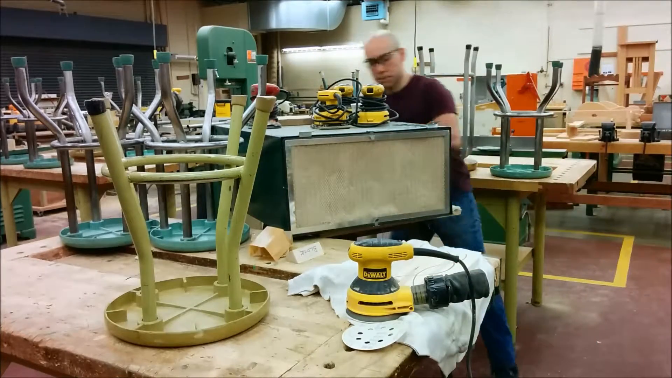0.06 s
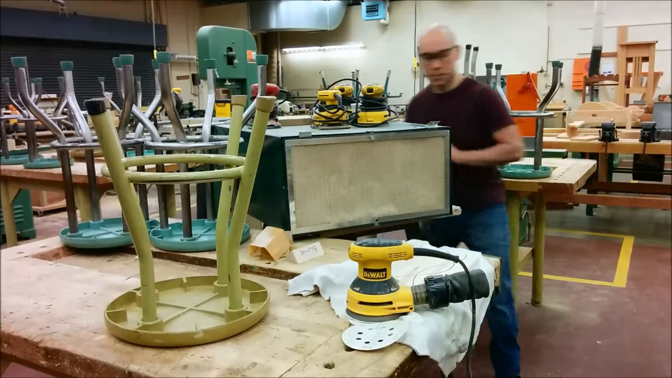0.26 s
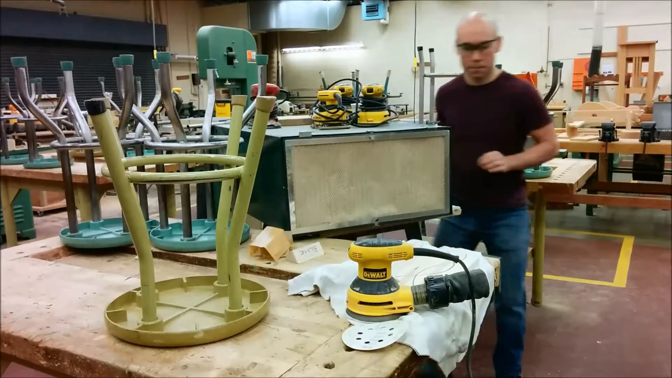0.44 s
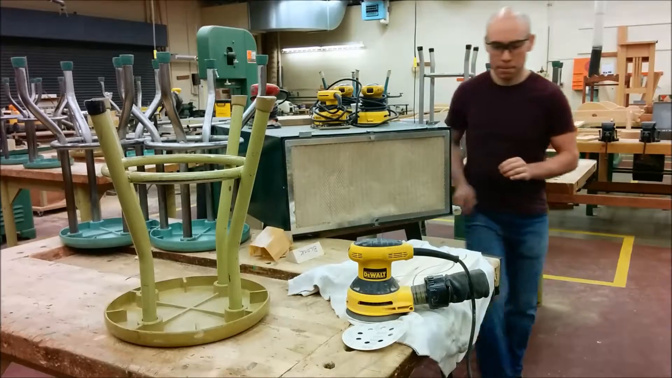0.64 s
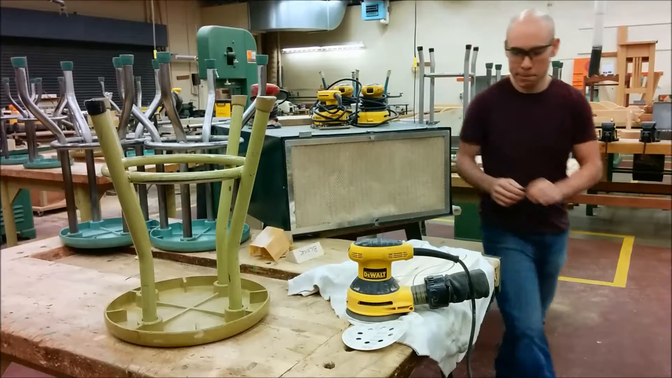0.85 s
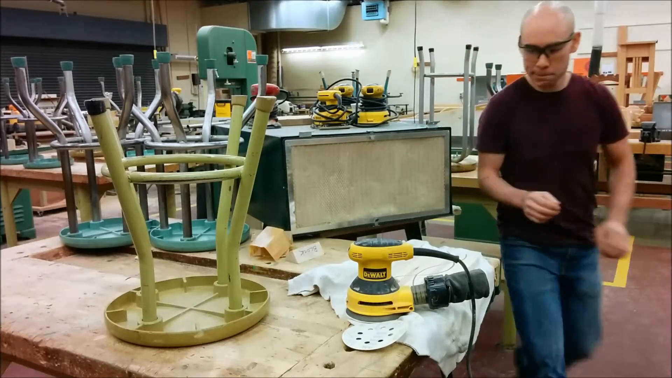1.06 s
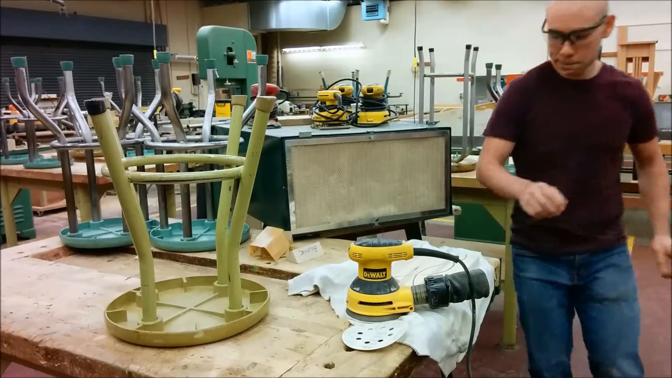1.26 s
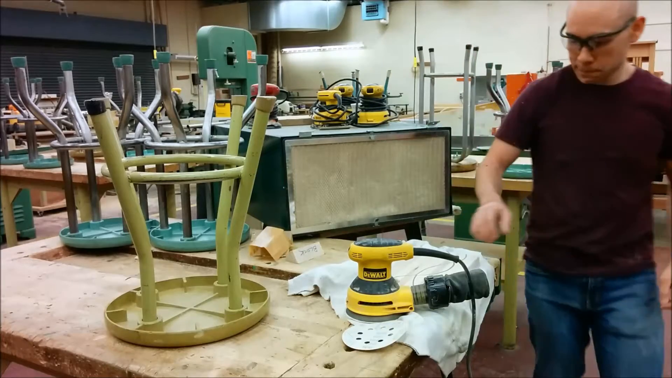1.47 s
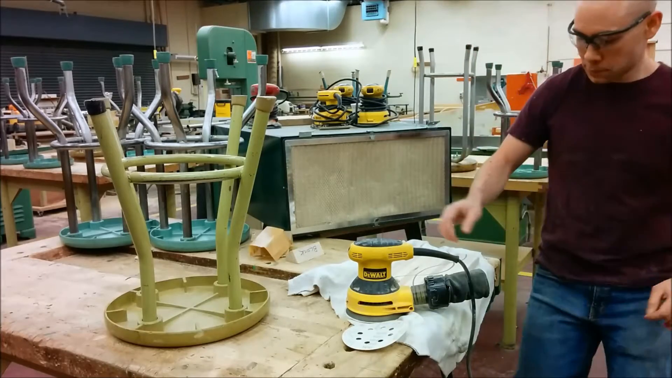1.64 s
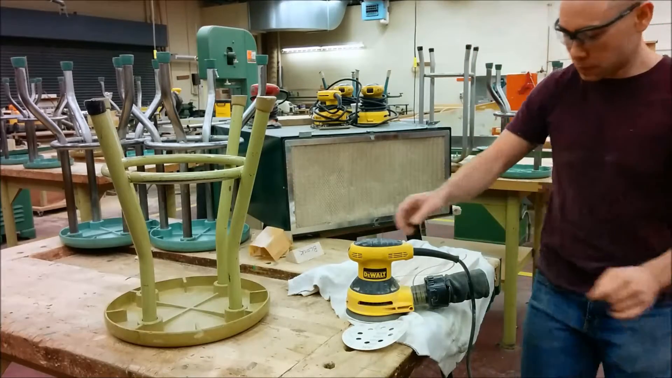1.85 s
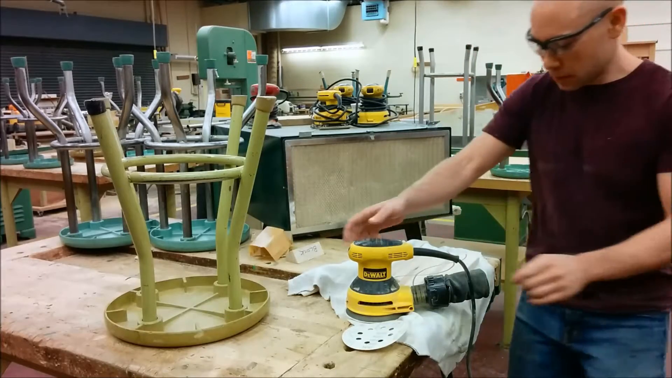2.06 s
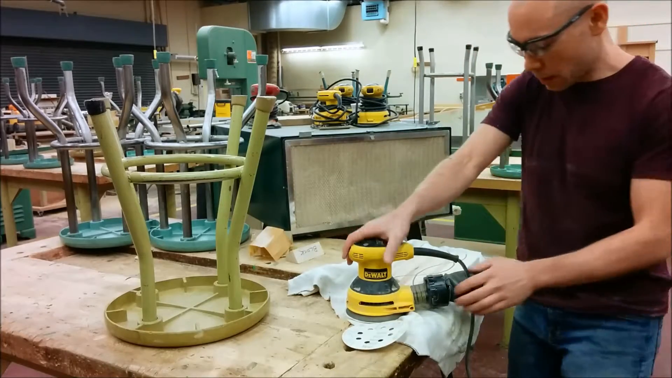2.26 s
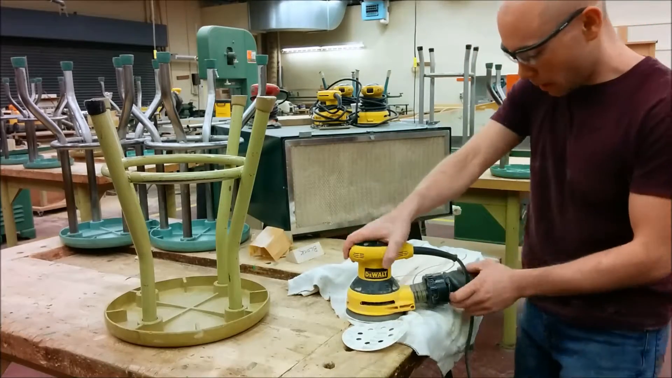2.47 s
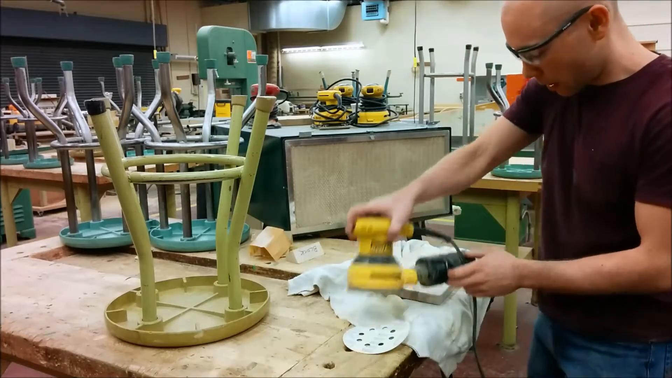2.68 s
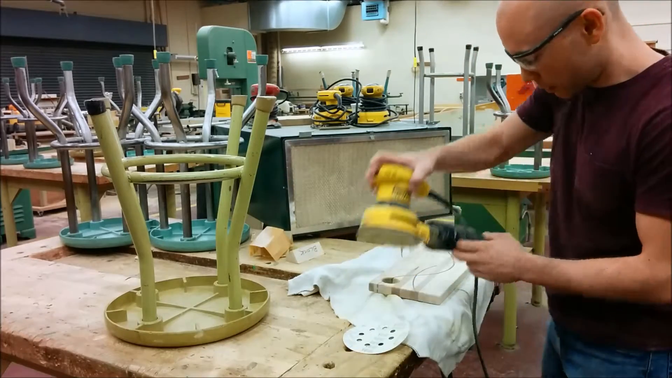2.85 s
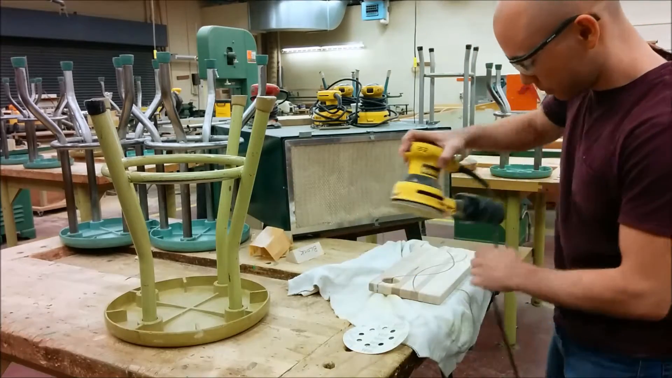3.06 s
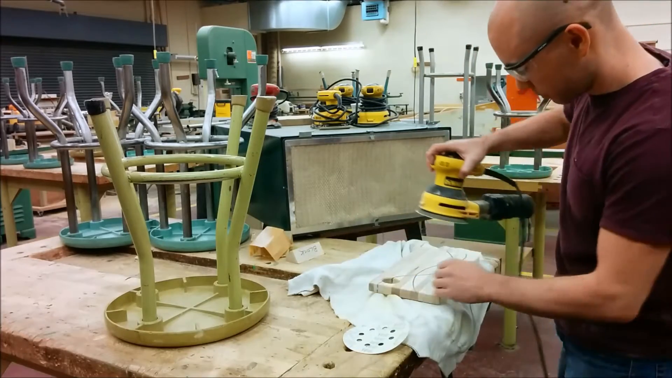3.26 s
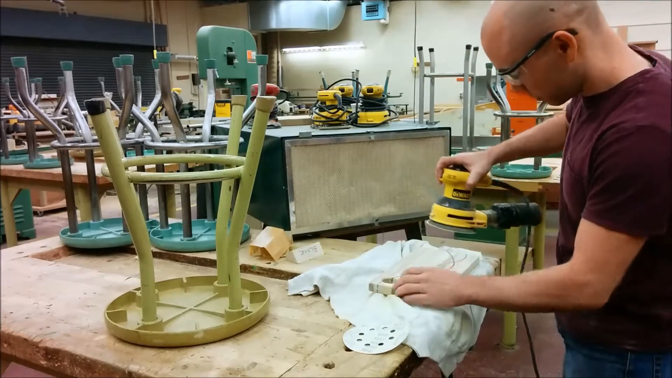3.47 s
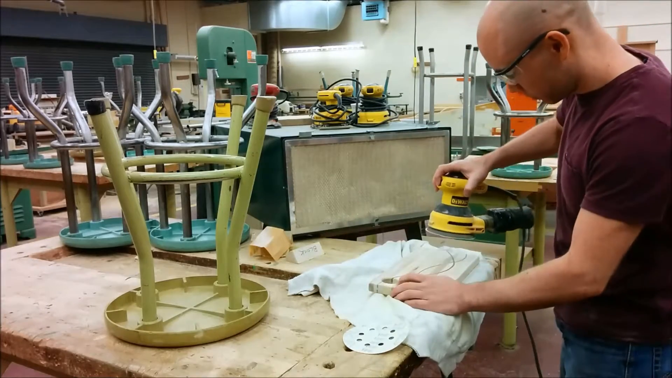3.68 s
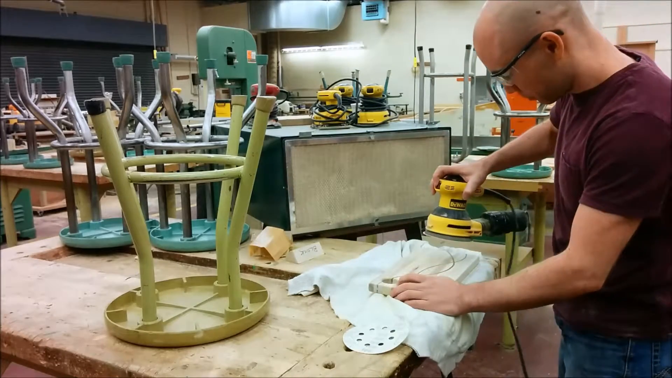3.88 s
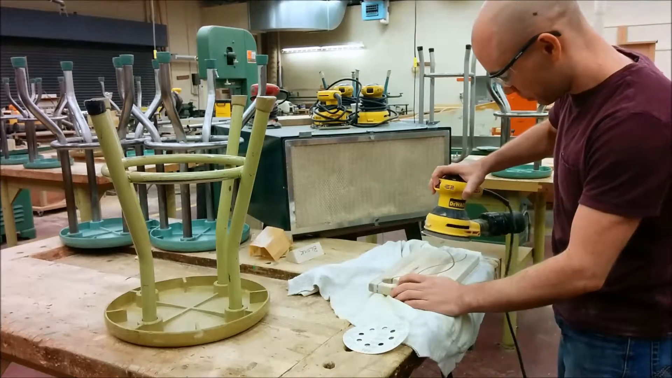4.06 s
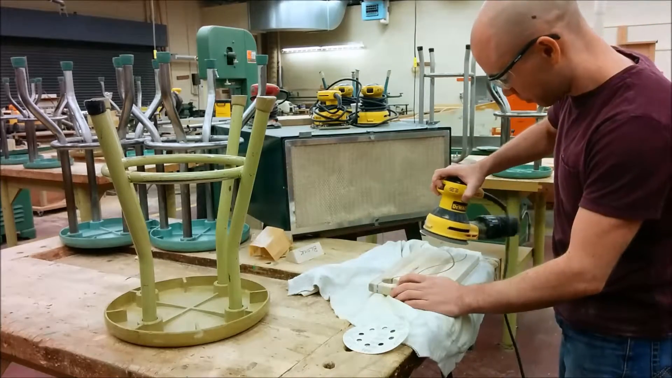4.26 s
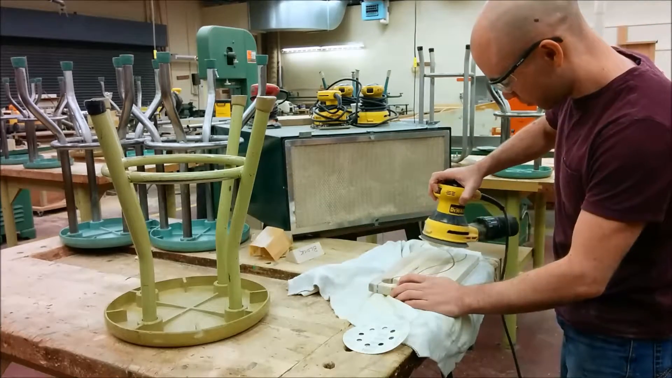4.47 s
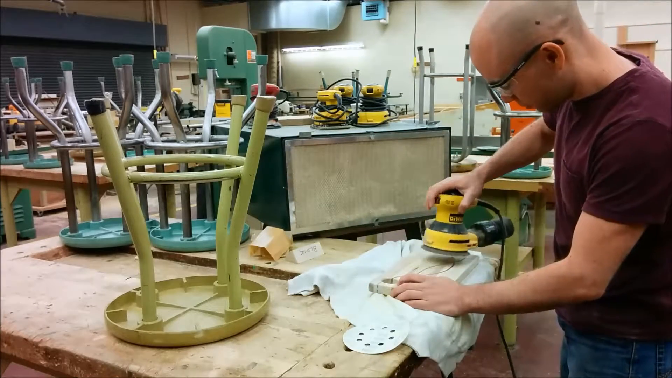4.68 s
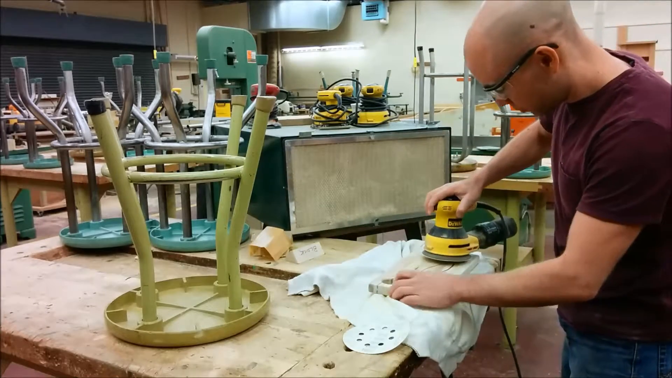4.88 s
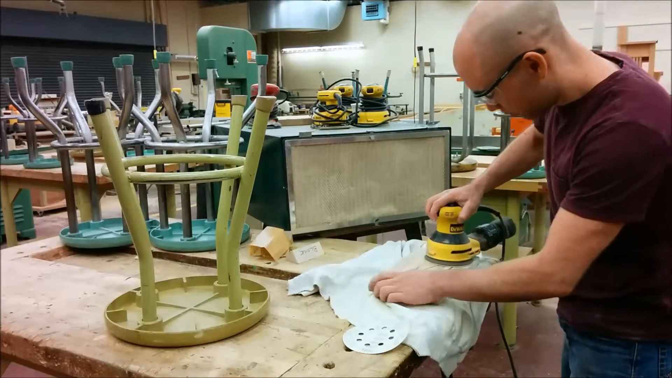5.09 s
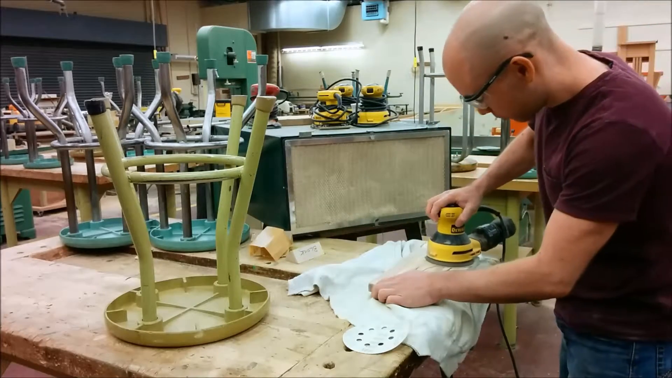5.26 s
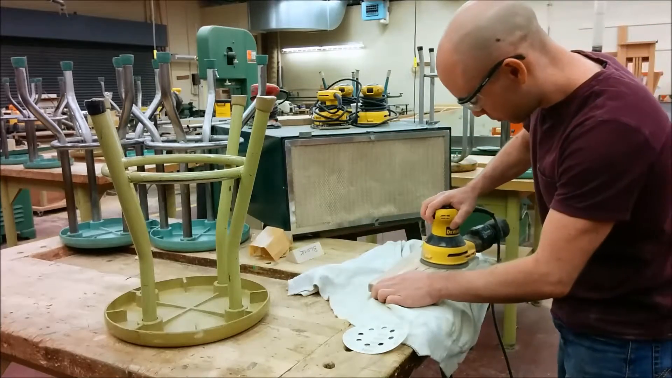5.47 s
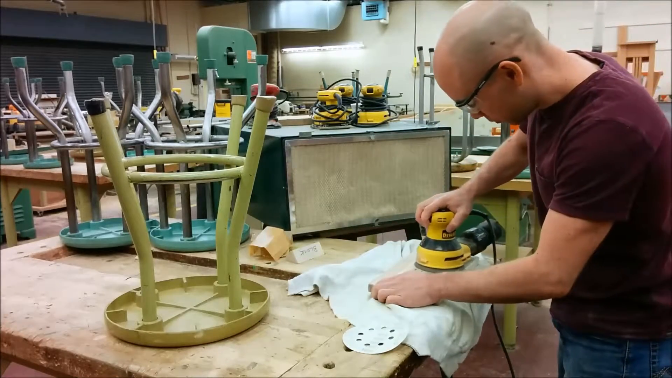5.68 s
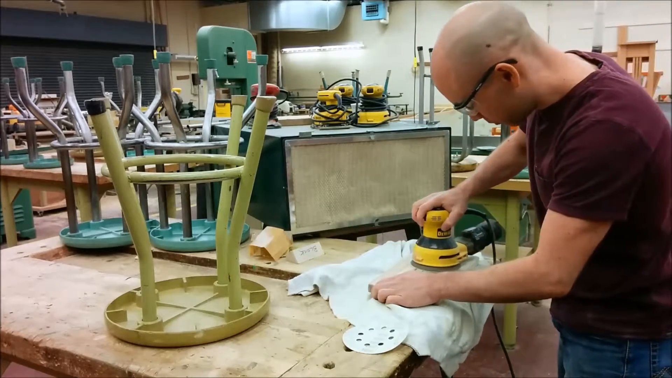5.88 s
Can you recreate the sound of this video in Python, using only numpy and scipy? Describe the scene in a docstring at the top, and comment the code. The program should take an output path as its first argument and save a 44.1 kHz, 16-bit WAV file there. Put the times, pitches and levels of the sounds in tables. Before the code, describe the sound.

Near silence opens into a low mains hum and airy extractor drone, pulsing unevenly as noise suppression chops it. Dull housing thumps, dry rattles and light shoe and hand scuffs mix in. Then a hard click, and a handheld sander revs quickly from growl to bright whine, grazes the wood, and roars with hiss, grit and low vibration. Single microphone in a hard workshop, same sound in both channels.

```python
"""A woodworking shop: a dust extractor drones, with mains hum, resonant noise and air rush throbbing with its shaft.
Its housing thumps and rattles in ringing modes; shoes and hands scuff near by in bursts of band noise.
Then an orbital sander is switched on, spins up, whines and is laid on wood: its tones follow one shaft,
and its growl, grit and hiss pulse once a turn, with the mains hum and drone returning under it.
One microphone, whose noise suppressor deepens the drone's throb."""
import sys
import numpy as np
from scipy import signal
from scipy.fft import rfft, irfft, next_fast_len
from scipy.io import wavfile
from scipy.ndimage import uniform_filter1d

SR = 44100
rng = np.random.default_rng(int(sys.argv[2]) if len(sys.argv) > 2 else 0)


def to_wav(sig):
    """Store sig (one row per channel, or 1-D mono) as 16-bit WAV at the path in sys.argv[1].

    Samples outside -1..1 are clipped; the rate is SR.
    """
    pcm = np.clip(np.atleast_2d(sig), -1, 1) * 32767
    pcm = np.round(pcm).astype(np.int16)
    wavfile.write(sys.argv[1], SR, pcm.T)  # frames by channels


N = 261572
t = np.arange(N) / SR

# Microphone hiss spectrum: pitch_hz, level_db (relative)
HISS_SPECTRUM = [(12, -25), (20, 9), (65, -15), (896, -15), (1750, -21.5), (3520, -27.5), (4410, -32),
                 (5360, -29.5), (16000, -29.5)]
HISS_DB, TOP_HZ = -71, 15850

# Extractor. Levels of its layers: time_s, hum_db, rumble_db, ring_db, rush_db
DRONE_LEVELS = [(0, -88, -83, -101, -90), (.06, -85, -78, -98, -90), (.11, -70, -87, -95, -95),
                (.2, -59, -64.5, -92, -83), (.32, -47.5, -56.5, -79, -92), (.55, -39.5, -56, -61, -66),
                (.75, -35.5, -50.5, -58.5, -69.5), (1.15, -33.5, -42, -52, -58.5),
                (1.45, -34, -42, -48.5, -53), (1.68, -40.5, -44.5, -56.5, -61),
                (1.8, -46.5, -49.5, -61, -65), (2.2, -51.5, -50, -60, -68), (2.5, -54.5, -49.5, -57, -67.5),
                (3., -55, -55, -58.5, -74.5), (3.65, -51.5, -51, -60.5, -70.5),
                (3.92, -50.5, -46, -62, -66), (3.98, -68, -55.5, -60, -68), (4.15, -64, -48.5, -53.5, -68),
                (4.22, -45, -41, -56, -64.5), (4.33, -69, -36, -41, -49.5)]
# Suppressor grip: time_s, expansion (0 = none)
GRIP = [(0, 0.08), (.8, 0.05), (1.5, 0.81), (1.8, 0.76), (3, 1.03), (4.3, 0.69), (4.5, 0.15), (5.93, 1.3)]
HUM_HZ, SHAFT_HZ = 119.6, 9.228
# Throb of the hum: thrice_a_turn_db, thrice_peak_s, once_a_turn_db, once_peak_s
HUM_THROB = (2.6, 0.024, 3, 0.075)
# Throb of rumble, ring and rush, one row each: same columns
LAYER_THROBS = [(4.5, 0.021, 2, 0.093), (3.5, 0.014, 1.5, .005), (2, 0.014, -0.5, 0.019)]
# Loping once a turn: time_s, bass_depth_db, upper_depth_db
LOPE = [(.85, 0, 0), (1.05, 1, 4.5), (1.6, 1, 4.5), (1.8, 1, 1), (2.3, 3, 1), (3.25, 3, 1), (3.45, 0, 1),
        (4.3, 0, 1)]
# Peak of the lope: bass_peak_s, upper_peak_s
LOPE_PEAKS = (.068, .037)
# Resonances of the three noise layers: pitch_hz, width_hz, level_db (relative)
RUMBLE = [(53.6, 13, -11.5), (138.5, 10.6, 1), (189, 31, 5), (270.5, 16, -3), (295, 98, -0.5),
          (333, 440, -3.5), (461, 110, -3.5)]
RING = [(592, 8.7, -4), (675, 130, -7.5), (707, 48, -3.5), (739.6, 29, -3), (886, 99, -8)]
RUSH = [(1007, 360, 3), (1490, 340, -3), (2040, 210, 0), (2295, 210, -5.5), (2420, 990, -2),
        (3500, 520, -8.5), (4900, 430, -33), (7100, 4600, -22.5)]
# Hum overtones in rumble, ring and rush, one list each: multiple, level_db (against the noise, before grip)
HUM_OVERTONES = [
    [(2, -4.5), (3, -5), (4, -30)],
    [(5, -17.5), (6, -1.5)],
    [(18, -16.5)],
]
# Fan orders in the rumble: multiple (of the shaft), level_db (against the noise)
FAN_ORDERS = [(16, -9.5), (21, -10.5), (30, -12.5), (42, -15)]

# Low thumps of the housing: start_s, level_db (before THUMP_TRIM_DB)
THUMPS = [(1.673, -25), (1.781, -36), (1.925, -26.5), (2.034, -38), (2.151, -30), (2.326, -38),
          (2.412, -36), (2.541, -50), (2.652, -35), (2.759, -39), (2.975, -46), (3.084, -42), (3.194, -41),
          (3.375, -29.5), (3.59, -34), (3.736, -39), (4.095, -34), (4.203, -30), (4.311, -34)]
# Modes rung by a thump: pitch_hz, level_db (relative)
THUMP_MODES = [(119.6, -6.5), (147, 2), (190, -4.5), (272, -6.5), (350, -11)]
THUMP_TRIM_DB, THUMP_RISE_S, THUMP_HELD_S, THUMP_T60_S = -15, 0.0035, 0.021, 0.12

# Rattles of the housing: start_s, blow_db, treble_db (against the blow, before PUFF_TRIM_DB)
RATTLES = [(0.947, -43, -8.5), (1.02, -41, -9.5), (1.098, -36.5, -10.5), (1.128, -38.5, -8.5),
           (1.175, -38, -9.5), (1.203, -34.5, -7.5), (1.237, -39.5, -7), (1.288, -33.5, -10),
           (1.318, -39, -8), (1.344, -37.5, -8.5), (1.412, -40.5, -6), (1.454, -41.5, -3),
           (1.503, -32.5, -12.5), (1.561, -36, -16), (1.603, -36, -10), (1.671, -37.5, -10),
           (1.711, -39, -9.5), (1.778, -41.5, -14), (1.814, -39, -15), (1.886, -41.5, -12),
           (1.921, -37.5, -9), (1.961, -37.5, -6.5), (2.056, -35.5, -18), (2.075, -40.5, -8),
           (2.179, -49, -8.5), (2.27, -57, -21), (2.368, -41.5, -13.5), (2.505, -44, -13), (2.612, -46, -9),
           (2.689, -42, -16.5), (2.796, -45, -19), (2.897, -43, -21), (2.938, -51, -14), (3.02, -37.5, -16),
           (3.05, -51, -12), (3.121, -42.5, -17), (3.228, -43.5, -22), (3.294, -46, -21), (3.336, -51, -19),
           (3.445, -46, -20), (3.485, -51, -20), (3.547, -43, -10.5), (3.628, -45, -26), (3.77, -47, -18),
           (3.881, -45.5, -18), (3.91, -42, -10), (4.022, -47.5, -10.5), (4.103, -46, -15),
           (4.135, -43.5, -10), (4.211, -43, -30)]
# Modes rung by a rattle: pitch_hz, level_db (against the blow)
RATTLE_MODES = [(595, -14), (680, -14), (713, -6.5), (748, -13.5), (885, -19.5), (1020, -22)]
RATTLE_HELD_S, RATTLE_HELD_S_PER_DB, RATTLE_T60_S, PUFF_TRIM_DB = 0.015, 0.001, 0.06, -6

# Scuffs of shoes and hands: start_s, level_db (before stutter), pitch_hz, width_hz, rise_s, held_s, tail_t60_s
SCUFFS = [(0.213, -57.5, 690, 1190, .004, 0.0046, 0.068), (0.577, -73, 8300, 4000, 0.0046, 0.034, 0.78),
          (.577, -78, 12500, 6000, .004, .02, .4), (1.428, -59.5, 6540, 3000, .004, 0.012, 0.32),
          (1.43, -62.5, 9400, 5000, .005, 0.06, 0.23), (1.43, -76, 13000, 5000, .005, 0.064, .4),
          (1.47, -62, 5800, 1500, .01, 0.02, 0.13), (1.495, -58, 6400, 2400, .006, 0.013, 0.12),
          (1.52, -74.5, 8000, 4000, .01, .05, .8), (1.935, -67, 7600, 6000, .005, 0.024, 0.3),
          (1.935, -76, 13000, 5000, .004, .02, .3), (2.403, -62, 7300, 2600, 0.0065, 0.012, 0.34),
          (2.402, -56, 2800, 1600, 0.0094, 0.012, 0.1), (2.412, -57, 3470, 1800, 0.01, 0.024, 0.06),
          (2.413, -62, 8000, 4030, 0.0073, 0.015, 0.3), (2.414, -59, 1980, 600, 0.0067, 0.022, 0.087),
          (2.437, -47.5, 2820, 2800, 0.0026, 0.0086, 0.13), (2.461, -66, 3600, 1200, .006, 0.015, 0.037),
          (2.438, -63, 6500, 3000, .003, 0.007, 0.11), (2.448, -52, 1440, 1300, 0.0046, 0.034, 0.04),
          (2.405, -76, 12500, 6000, .006, .05, 0.48), (2.69, -79, 9100, 8000, .005, 0.039, 0.45),
          (3.885, -71, 4500, 3500, .012, 0.025, .1), (3.915, -68, 7360, 5000, .005, 0.012, 0.39),
          (3.915, -75, 5300, 700, .004, 0.01, 0.23), (4.262, -70, 7850, 6050, 0.0061, 0.027, 0.69),
          (4.313, -58, 2900, 2400, 0.026, 0.044, 0.093)]
# Clicks of hand, switch and pad: start_s, level_db, pitch_hz, width_hz, tail_t60_s
CLICKS = [(0.582, -61, 6050, 9000, 0.3), (1.935, -60, 7000, 9000, .04), (2.420, -47, 3200, 2400, .03),
          (2.443, -48, 3500, 5000, 0.02), (2.456, -45, 1500, 1200, 0.028), (2.472, -55, 1200, 1200, 0.053),
          (3.909, -38, 5300, 4200, 0.033), (4.258, -48, 7600, 8850, 0.018), (4.351, -40, 4000, 5000, 0.017),
          (4.381, -40.5, 6500, 5000, .015), (4.651, -9, 7400, 7000, 0.0065), (4.662, -23, 5100, 1500, .02),
          (4.678, -26, 5100, 1500, .02)]
CLICK_RISE_S = 0.00082

# Mains hum and drone under the sander: time_s, level_db
RETURNING_HUM_LEVELS = [(4.9, -60), (5.1, -52), (5.25, -39), (5.4, -45), (5.5, -37), (5.75, -36),
                        (5.93, -38)]
# Resonances of the drone under the sander: pitch_hz, width_hz, level_db (relative)
RETURNING_DRONE = [(100, 20, -22), (147, 25, -13), (188, 17, -2.5), (258, 16, -9)]
RETURNING_HUM_HZ, RETURNING_DRONE_DB = 120.8, -3  # drone noise against the hum's rms of 1

# Sander. Shaft spinning up: time_s, speed_turns_per_s
SHAFT_SPEED = [(4.345, 0), (4.45, 40), (4.55, 70), (4.67, 96), (4.742, 107.7), (4.896, 124.9), (5.056, 138),
               (5.144, 144.2), (5.28, 151), (5.4, 155.3), (5.522, 158.5), (5.68, 160.8), (5.836, 162.2),
               (5.93, 162.7)]
SANDER_START_S, WOBBLE = 4.345, 0.0015  # wobble: share of the speed
# Main levels: time_s, shake_db, growl_db, grit_db, rasp_db, fine_hiss_db (last three before HISS_TRIM_DB)
SANDER_LEVELS = [(4.35, -74, -43.5, -49, -79, -83), (4.41, -79, -39.5, -39, -71, -77),
                 (4.51, -92, -35.5, -34.5, -41, -47.5), (4.68, -60, -33.5, -32.5, -35, -39.5),
                 (4.88, -61, -29.5, -31.5, -30, -43), (5.02, -61, -28, -28.5, -30, -37),
                 (5.16, -41, -25.5, -30, -29, -32.5), (5.34, -45, -27, -29.5, -29, -31.5),
                 (5.45, -34.5, -27.5, -30, -27, -27.5), (5.6, -27, -26, -31, -29.5, -29),
                 (5.71, -26.5, -27, -31, -27.5, -30), (5.76, -27, -27, -42, -36, -28.5),
                 (5.93, -26, -26, -34, -35, -29.5)]
HISS_TRIM_DB, OVERTONE_TRIM_DB = -1.5, -1
# Pad grazing the wood: peak_s, hum_swell_db, shake_db
GRAZES = [(4.665, -46, -63), (4.961, -42.5, -37), (5.045, -51, -40), (5.186, -43, -32.5), (5.365, -54, -43)]
GRAZE_WIDTH_S, GRAZE_HISS_DB = 0.011, 0.5
# Overtones of the off-centre pad: time_s, then one level_db per multiple (before OVERTONE_TRIM_DB)
SHAKE_OVERTONES = [(4.5, -75, -68, -73, -74, -74), (4.75, -69, -53, -45.5, -58, -60),
                   (4.85, -66, -58, -47.5, -62, -64), (4.95, -51, -38, -38, -58, -55),
                   (5.05, -53, -51, -42, -52, -49), (5.15, -35.5, -41, -41, -55, -56),
                   (5.25, -31.5, -42, -35.5, -36, -40), (5.35, -38.5, -34, -34, -48, -52),
                   (5.45, -33, -41, -37, -40, -51), (5.55, -30, -39, -28.5, -38, -50),
                   (5.65, -37.5, -38, -42, -33.5, -40), (5.75, -34.5, -38.5, -39, -44, -42),
                   (5.85, -45, -32.5, -35, -38, -52), (5.93, -31, -42, -37, -28, -37)]
# Those overtones: multiple (of the shaft)
SHAKE_MULTIPLES = (2, 3, 4, 5, 5.55)
# Fan whine before its echo: time_s, blade_db, upper_side_db, lower_side_db, blade_octave_db, whistle_db
WHINE_LEVELS = [(4.42, -78, -74, -78, -76, -51), (4.55, -42, -71, -75, -39.5, -45),
                (4.65, -47, -52, -58, -51, -58), (4.75, -40, -40, -48, -58, -58),
                (4.9, -34.5, -46, -42, -50, -44), (5.0, -30, -33, -47, -48, -49),
                (5.07, -41, -37, -48, -51, -32), (5.16, -33.5, -31.5, -33, -54, -40),
                (5.22, -39, -35, -59, -52, -32), (5.32, -40, -42, -46, -50, -38),
                (5.45, -35.5, -39, -57, -38.5, -33), (5.6, -32, -40, -54, -43, -35),
                (5.72, -32, -45, -46, -44, -34), (5.8, -27.5, -42, -37, -50, -54),
                (5.93, -26, -43, -41, -47, -50)]
BLADES = 13
# Side tones of the blades: multiple (of the shaft), upper then lower
SIDE_MULTIPLES = (12, 11.2)
# Upper fan tones: multiple (of the shaft), level_db (against whistle_db)
WHISTLE = [(24, -10), (29.5, -13), (31, -5), (33, -11)]
ROOM_T60_S, ROOM_DB = 0.45, -7  # shop echo against the direct sound
# Bearing squeal: time_s, pitch_hz
SQUEAL_PITCH = [(4.4, 7900), (4.55, 8020), (4.7, 8130), (4.9, 8290), (5.05, 8340), (5.3, 8400)]
# Bearing squeal: time_s, level_db (peak)
SQUEAL_LEVELS = [(4.4, -70), (4.55, -58), (4.7, -43), (4.85, -52), (4.97, -44), (5.05, -34), (5.15, -43),
                 (5.3, -82)]
# Casing noise: time_s, level_db
CASING_LEVELS = [(4.35, -71), (4.45, -45), (4.7, -43), (5.0, -38), (5.3, -34), (5.7, -34.5), (5.78, -36.5),
                 (5.93, -37)]
# Resonances of casing, growl, grit, rasp and fine hiss: pitch_hz, width_hz, level_db (relative)
CASING = [(2700, 100, -17), (3260, 200, 0), (3640, 110, 1), (3910, 59, 1.5), (4130, 100, 0.5),
          (4900, 150, -0.5), (5130, 49, 1.5), (5390, 160, 1), (6440, 110, -6), (6740, 320, 1),
          (9000, 300, -9)]
GROWL = [(232, 390, -6), (480, 220, 1), (622, 100, 0), (706, 40, -1.5), (795, 130, 3), (909, 69, 0.5),
         (1070, 480, 4), (1426, 220, -2.5), (1625, 36, -3.5), (1748, 33, -6.5), (1900, 470, 3.5),
         (2190, 1000, 4)]
GRIT = [(2790, 3800, 1), (3720, 1960, -0.5), (4470, 550, -3), (5000, 510, -5.5)]
RASP = [(5440, 1600, 0), (6550, 2800, 0), (8900, 4200, 0)]
FINE = [(9550, 5200, 7.5), (13000, 2400, 1), (14600, 2600, -2)]
TICKS_PER_S, TICK_DB, TICK_SPREAD_DB, TICK_T60_S = 110, -6, 2.5, 0.006


def undb(db):
    """Turn dB into gain."""
    return 10 ** (np.asarray(db) / 20)


def unit(x):
    """Scale to an rms of 1."""
    return x / np.sqrt(np.mean(x ** 2))


def curves(table):
    """Join every column of a table in time with straight lines."""
    s, *columns = np.transpose(table)
    return [np.interp(t, s, column) for column in columns]


def walk(rate):
    """Random levels, rate per second, smoothed twice by a moving mean; rms 1."""
    held = int(SR / rate)
    steps = np.repeat(rng.standard_normal(N // held + 1), held)
    return unit(uniform_filter1d(uniform_filter1d(steps, held), held)[:N])


def shaped(gain_of_hz):
    """White noise filtered to the given spectrum; rms 1."""
    size = next_fast_len(N)
    hz = np.arange(size // 2 + 1) * SR / size + 1e-3
    spectrum = rfft(rng.standard_normal(size)) * gain_of_hz(hz)
    return unit(irfft(spectrum, size)[:N])


def resonant(modes):
    """Noise in steep resonances whose powers add."""
    def gain(hz):
        power = 0
        for f, width, db in modes:
            detuning = (hz * hz - f * f) / (hz * width)
            power = power + undb(2 * db) / width / (1 + detuning ** 2) ** 2
        return np.sqrt(power)
    return shaped(gain)


def patchy(modes, flicker_db, rate):
    """Noise in resonances that each swell and sink on their own; rms 1."""
    return unit(sum(undb(db + flicker_db * walk(rate)) * resonant([(hz, width, 0)])
                    for hz, width, db in modes))


def tones(phase, table, waver_db, rate, slip):
    """Multiples of a turning phase, each wavering alone in level and in phase (slip in radians)."""
    out = np.zeros(N)
    for multiple, db in table:
        level = np.sqrt(2) * undb(db + waver_db * walk(rate))
        out += level * np.sin(multiple * phase + slip * walk(rate))
    return out


def burst(s, db, hz, width_hz, rise_s, held_s, t60):
    """Band noise with a rise, a held part and a decaying tail."""
    edges = np.clip([hz - width_hz / 2, hz + width_hz / 2], 80, 0.45 * SR)
    first, out = int(s * SR), np.zeros(N)
    age = t[first:first + SR] - s
    band = signal.butter(2, edges, "band", fs=SR, output="sos")
    noise = unit(signal.sosfilt(band, rng.standard_normal(SR))[:len(age)])
    rise = np.clip(age / max(rise_s, 1e-4), 0, 1)
    decay = undb(db - 60 * np.maximum(age - held_s, 0) / max(t60, 0.005))
    out[first:first + SR] = rise * decay * noise
    return out


def blow(db, rise_s, held_s, t60):
    """Envelope of one blow: rise, hold, ring out."""
    age = t[:SR // 3]
    rise = np.clip(age / max(rise_s, 1e-4), 0, 1)
    return rise * undb(db - 60 * np.maximum(age - held_s, 0) / max(t60, 0.01))


def ringing(modes, detune):
    """Sines of the housing modes, starting together, each shifted by its detune factor."""
    age = t[:SR // 3]
    return sum(undb(db) * np.sin(2 * np.pi * hz * k * age) for (hz, db), k in zip(modes, detune))


def room(x):
    """The shop answers with a dense, decaying noise tail."""
    age = t[:int(ROOM_T60_S * SR)]
    tail = rng.standard_normal(len(age)) * undb(-60 * age / ROOM_T60_S) * (age > 0.004)
    tail /= np.sqrt(np.sum(tail ** 2))
    return x + undb(ROOM_DB) * signal.fftconvolve(x, tail)[:N]


def microphone_hiss():
    """Steady noise whose spectrum is joined on a logarithmic pitch scale."""
    hz, db = np.transpose(HISS_SPECTRUM)
    return undb(HISS_DB) * shaped(lambda f: undb(np.interp(np.log(f), np.log(hz), db)))


def throb(thrice_db, thrice_s, once_db, once_s):
    """Three pushes a turn of the shaft, made unequal by one swell a turn."""
    turn = 2 * np.pi * SHAFT_HZ
    return undb(thrice_db * np.cos(3 * turn * (t - thrice_s)) + once_db * np.cos(turn * (t - once_s)))


def suppress(x, quick_s=0.021, slow_s=0.054):
    """Expander: below the running mean is pushed down, above it is raised; the mean level is evened to 1."""
    def mean_power(v, s):
        width = int(s * SR)
        return np.abs(uniform_filter1d(uniform_filter1d(v * v, width), width)) + 1e-18
    y = x * (mean_power(x, quick_s) / mean_power(x, slow_s)) ** (curves(GRIP)[0] / 2)
    return y / np.sqrt(mean_power(y, slow_s))


def extractor():
    """Mains hum and three noisy layers with hum overtones, all throbbing with the shaft."""
    mains, shaft = 2 * np.pi * HUM_HZ * t, 2 * np.pi * SHAFT_HZ * t
    grip = curves(GRIP)[0]
    lurch = grip * walk(13)  # shared random unevenness, in a different measure for each layer
    bass_lope, upper_lope = (depth * np.cos(2 * np.pi * SHAFT_HZ * (t - peak_s))
                             for depth, peak_s in zip(curves(LOPE), LOPE_PEAKS))
    hum_db, rumble_db, ring_db, rush_db = curves(DRONE_LEVELS)
    hum = np.sin(mains) * throb(*HUM_THROB) ** grip * undb(4.8 * walk(24.61) + 1.8 * lurch)
    out = suppress(hum) * undb(hum_db + bass_lope)

    rumble, ring, rush = (
        # steady tones sink as the suppressor grips
        resonant(modes) + undb(2.5 - 25.0 * grip) * tones(mains, overtones, 3.5, 9, 0.7)
        for modes, overtones in zip((RUMBLE, RING, RUSH), HUM_OVERTONES))
    rumble = rumble + tones(shaft, FAN_ORDERS, 3.5, 9.2, 1.1)
    levels_db = (rumble_db + bass_lope, ring_db + upper_lope, rush_db + upper_lope)
    fade = np.clip((4.6 - t) / 0.81, 0, 1)  # the noisy layers give way to the sander
    for layer, beat, lurch_db, db in zip((rumble, ring, rush), LAYER_THROBS, (1.8, 0.8, 1.5), levels_db):
        throbbing = layer * throb(*beat) ** grip * undb(lurch_db * lurch)
        out += fade * undb(db) * suppress(throbbing)
    return out


def thumps():
    """Dull blows that ring the low modes of the housing."""
    out = np.zeros(N)
    detune = 1 + 0.02 * rng.standard_normal((len(THUMPS), len(THUMP_MODES)))
    for (s, db), shifts in zip(THUMPS, detune):
        shape = blow(db + THUMP_TRIM_DB, THUMP_RISE_S, THUMP_HELD_S, THUMP_T60_S)
        first = int(s * SR)
        out[first:first + len(shape)] += shape * ringing(THUMP_MODES, shifts)
    return out


def rattles():
    """Short blows ring the housing modes, longer for harder blows; each puffs gritty air in the duct."""
    low, puff = np.zeros(N), np.zeros(N)
    detune = 1 + 0.008 * rng.standard_normal((len(RATTLES), len(RATTLE_MODES)))
    for (s, db, treble_db), shifts in zip(RATTLES, detune):
        held_s = RATTLE_HELD_S + RATTLE_HELD_S_PER_DB * max(db + 43, 0)
        shape = blow(db, 0.005, held_s, RATTLE_T60_S)
        at = slice(int(s * SR), int(s * SR) + len(shape))
        low[at] += shape * ringing(RATTLE_MODES, shifts)
        puff[at] += shape * undb(treble_db + PUFF_TRIM_DB)
    return low + puff * undb(2 * walk(150)) * patchy(RUSH, 2.0, 30)


def scuffs():
    """Rubbing shoes and hands: bursts of band noise that stutter a little."""
    stutter = undb(2.4 * walk(200) + 2.0 * walk(70))
    return stutter * sum(burst(*row) for row in SCUFFS)


def clicks():
    """Hand, switch and pad: sharp noise bursts with no held part."""
    return sum(burst(s, db, hz, width_hz, CLICK_RISE_S, 0, t60) for s, db, hz, width_hz, t60 in CLICKS)


def graze_bumps():
    """A smooth bump from 0 to 1 and back for each graze of the pad."""
    return [np.exp(-0.5 * ((t - row[0]) / GRAZE_WIDTH_S) ** 2) for row in GRAZES]


def returning_hum(bumps):
    """Mains hum and drone under the sander: a steady pitch with resonant noise, which swells at each graze."""
    level = undb(curves(RETURNING_HUM_LEVELS)[0] + 2.4 * walk(24.87))
    level += sum(undb(hum_swell_db) * bump for (_, hum_swell_db, _), bump in zip(GRAZES, bumps))
    tone = np.sqrt(2) * np.sin(2 * np.pi * RETURNING_HUM_HZ * t + 0.54 * walk(17))
    return level * (tone + undb(RETURNING_DRONE_DB) * resonant(RETURNING_DRONE))


def pad_shake(phase, bumps):
    """The off-centre pad shakes once a turn, with overtones; grazes strengthen the shake."""
    level = undb(curves(SANDER_LEVELS)[0])
    level += sum(undb(shake_db) * bump for (_, _, shake_db), bump in zip(GRAZES, bumps))
    out = level * tones(phase, [(1, 0)], 1.8, 28, 0.55)
    for multiple, db in zip(SHAKE_MULTIPLES, curves(SHAKE_OVERTONES)):
        out += undb(db + OVERTONE_TRIM_DB) * tones(phase, [(multiple, 0)], 2.3, 30, 0.75)
    return out


def fan_whine(phase):
    """Blade tone, its octave and side tones echo in the shop; upper whistles stay dry."""
    blade_db, *side_db, octave_db, whistle_db = curves(WHINE_LEVELS)
    whine = undb(blade_db) * tones(phase, [(BLADES, 0)], 2.1, 45, 0.45)
    whine += undb(octave_db) * tones(phase, [(2 * BLADES, 0)], 2.5, 40, 0.6)
    for multiple, db in zip(SIDE_MULTIPLES, side_db):
        whine += undb(db) * tones(phase, [(multiple, 0)], 2.8, 50, 0.7)
    return room(whine) + undb(whistle_db) * tones(phase, WHISTLE, 3.5, 60, 0.8)


def bearing_squeal():
    """A thin gliding sine that wavers in level and phase."""
    phase = 2 * np.pi * np.cumsum(curves(SQUEAL_PITCH)[0]) / SR
    level = undb(curves(SQUEAL_LEVELS)[0] + 3.4 * walk(40))
    return level * np.sin(phase + 0.66 * walk(60))


def ticks():
    """Grit ticking in the pad: short cracks at random moments, a few much louder than the rest."""
    hits = (rng.random(N) < TICKS_PER_S / SR) * undb(TICK_SPREAD_DB * rng.exponential(size=N))
    decay = undb(-60 / (TICK_T60_S * SR))
    return undb(TICK_DB) * signal.lfilter([1], [1, -decay], hits)


def sanding_noise(phase, bumps):
    """Growl, grit, rasp and hiss pulse once a turn; ticks crack through all but the growl, casing included."""
    _, growl_db, grit_db, rasp_db, fine_db = curves(SANDER_LEVELS)
    pulse = np.cos(phase)
    flutter = walk(35)  # shared random flutter of level, weaker in the growl
    crack = 1 + ticks()
    out = undb(curves(CASING_LEVELS)[0] + 0.6 * flutter) * crack * patchy(CASING, 3.0, 14)
    out += undb(growl_db + 1.1 * pulse + 0.25 * flutter) * patchy(GROWL, 2.04, 18)
    for db, modes in ((grit_db, GRIT), (rasp_db, RASP), (fine_db, FINE)):
        motion_db = GRAZE_HISS_DB * sum(bumps) + 1.24 * pulse + 0.61 * flutter + 0.67 * walk(300)
        out += crack * undb(db + HISS_TRIM_DB + motion_db) * patchy(modes, 1.3, 30)
    return out


def sander():
    """One wobbling shaft drives shake, whine and noise pulses, beside returning hum and bearing squeal."""
    speed = curves(SHAFT_SPEED)[0] * (1 + WOBBLE * walk(30))
    phase = 2 * np.pi * np.cumsum(speed) / SR
    bumps = graze_bumps()
    out = returning_hum(bumps) + pad_shake(phase, bumps) + fan_whine(phase)
    out += bearing_squeal() + sanding_noise(phase, bumps)
    return out * np.clip((t - SANDER_START_S) / 0.0033, 0, 1)


def scene():
    """All sources at one microphone, the same in both channels."""
    mix = microphone_hiss() + extractor() + thumps() + rattles() + scuffs() + clicks() + sander()
    return np.tile(mix, (2, 1))


def record(dry):
    """The recorder cuts the top with a steep low-pass."""
    return signal.sosfilt(signal.ellip(14, 0.3, 90, TOP_HZ, fs=SR, output="sos"), dry)


dry = scene()
out = record(dry)
to_wav(out)
```